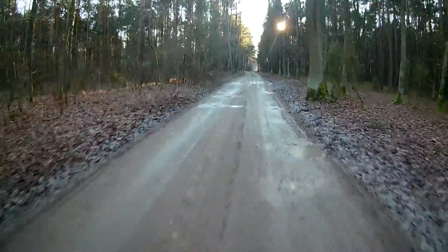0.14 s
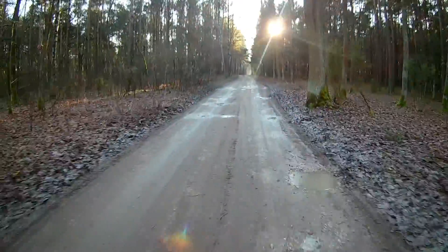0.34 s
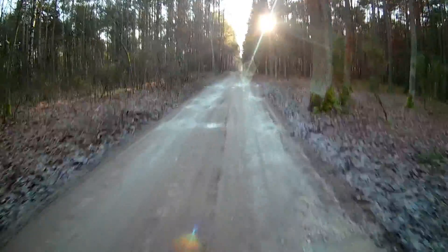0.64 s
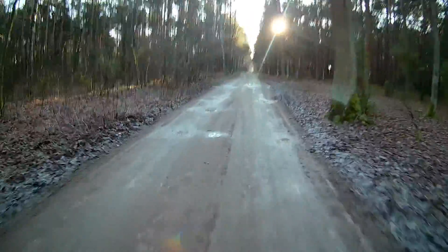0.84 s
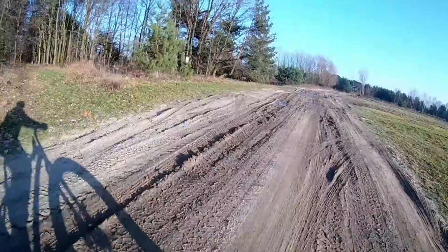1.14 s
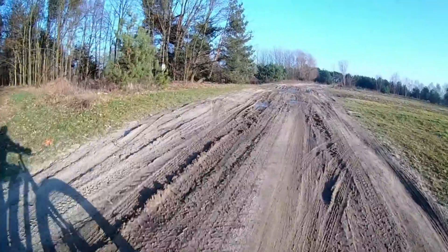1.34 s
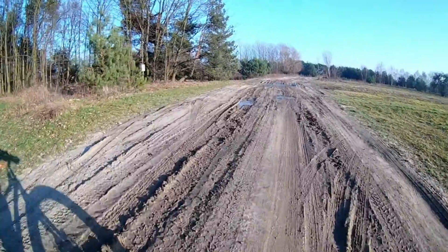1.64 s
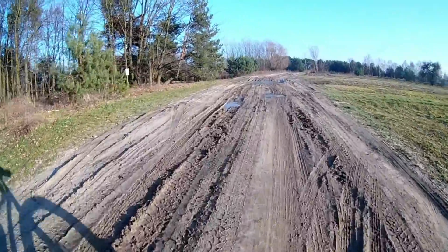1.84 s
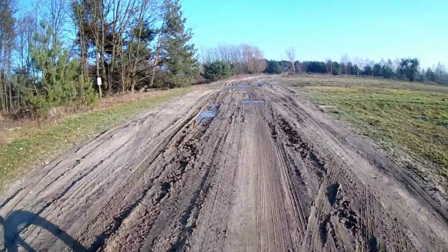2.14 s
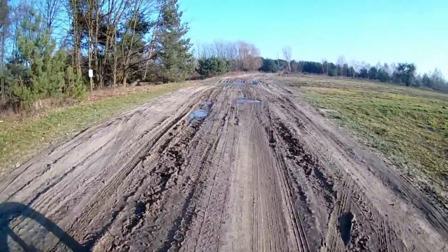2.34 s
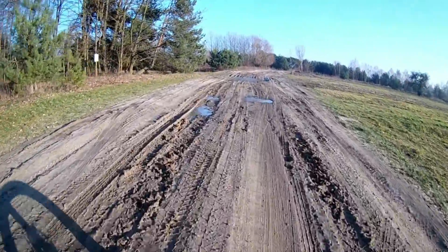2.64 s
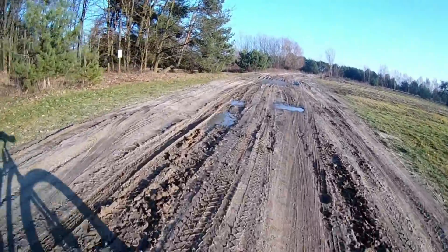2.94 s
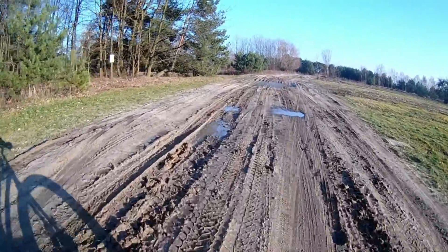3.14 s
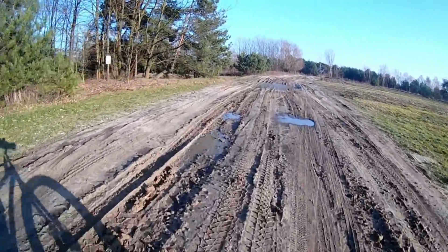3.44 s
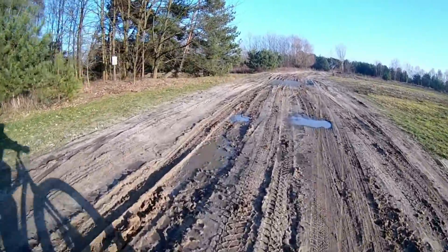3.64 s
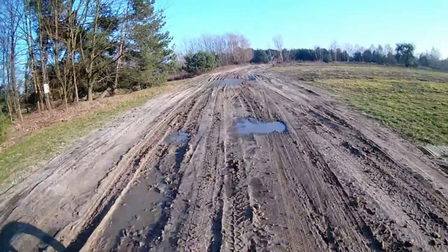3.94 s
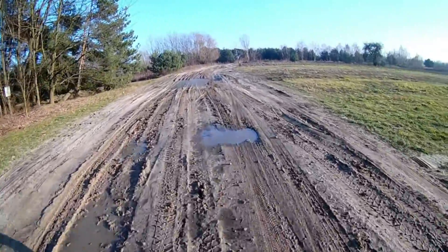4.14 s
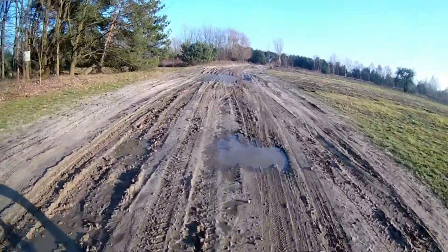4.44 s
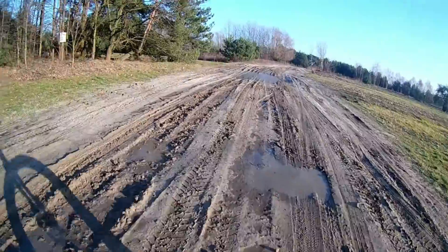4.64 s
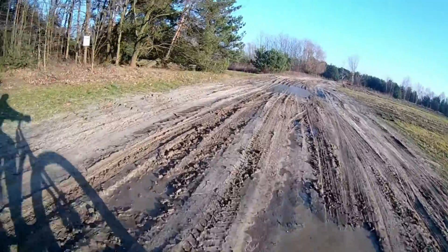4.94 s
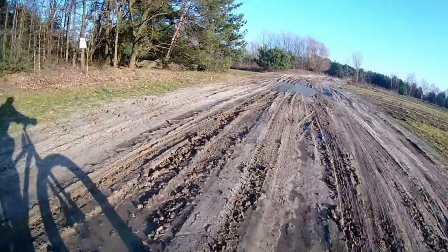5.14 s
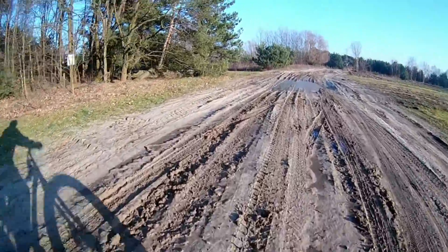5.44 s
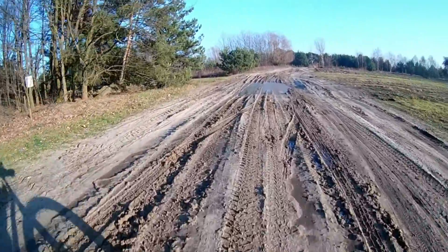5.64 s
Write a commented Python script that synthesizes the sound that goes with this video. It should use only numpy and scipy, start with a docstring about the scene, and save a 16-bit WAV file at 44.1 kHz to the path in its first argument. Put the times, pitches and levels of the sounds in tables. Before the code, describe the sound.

Boxy, close bike-mounted sound: rough wet tyre rumble and hard clacks, a brief dip, then slower muddy rolling with dull knocks and squelches.

```python
"""First comes the fast rumble of a wide-tyred bicycle on a wet forest road, with knocks, clacks and gritty spray.
After a brief dip in level, the bike is pedalled more slowly along a rutted, muddy field track.
The microphone rides in a closed plastic case: random grains stand for the tread and the wet dirt, short bursts
of pushes for knocks and clacks, and most of them ring the case. The mount wobbles at a very low pitch; a rubbing
part sings as narrow noise, two faint high tones sound once, and shaped noise makes buffeting, fizz and hiss."""
import sys
import numpy as np
from scipy import signal
from scipy.fft import rfft, irfft
from scipy.io import wavfile
from scipy.ndimage import uniform_filter1d

SR = 44100
rng = np.random.default_rng(int(sys.argv[2]) if len(sys.argv) > 2 else 0)


def master_out(mix):
    """Clip the mix to full scale and print it as 16-bit PCM to the path in sys.argv[1]."""
    frames = np.transpose(np.atleast_2d(mix))
    ceiling = np.clip(frames, -1, 1)
    pcm = np.round(ceiling * 32767).astype(np.int16)
    wavfile.write(sys.argv[1], SR, pcm)


N = 255339
TIME = np.arange(N) / SR
FREQS = np.maximum(np.fft.rfftfreq(8192, 1 / SR), 1)
# the forest road gives way to the field track at this time (seconds)
CHANGE_S = 1.19


def undb(db):
    """Turn decibels into a gain."""
    return 10 ** (np.asarray(db) / 20)


def unit(x):
    """Scale a sound to an rms level of 1."""
    return x / np.std(x)


def stretch(s, forest, field):
    """Pick the value that holds at time s: one on the forest road, another on the field track."""
    return np.where(s < CHANGE_S, forest, field)


def add(out, s, x):
    """Mix the sound x in at time s, in seconds."""
    i = max(int(s * SR), 0)
    out[i:i + len(x)] += x[:N - i]


def colour(points):
    """Gain at each frequency, drawn through points of pitch in Hz and level in dB."""
    hz, db = np.transpose(points)
    return undb(np.interp(np.log(FREQS), np.log(hz), db))


def resonance(hz, width):
    """Gain of a resonance with steep skirts; width in Hz."""
    return 1 / (1 + (2 * (FREQS - hz) / width) ** 2)


# The pitches at which the case and mount like to ring.
# Each row: pitch in Hz, width in Hz, level in dB.
CASE_RESONANCES = [(301.4, 42, -4.5), (336.5, 62.6, 0), (400, 63, -6), (442, 78, -5), (470.6, 60, 0.5),
                   (567.6, 51, -0.5), (608, 141, -9), (863, 79, -12), (970, 100, -14.5), (1158, 250, -16.5),
                   (1394, 254, -14.5), (1460, 109, -12.5), (1684, 180, -22), (1982, 240, -19.5),
                   (2149, 240, -19), (2703, 286, -27.5), (3253, 178, -30), (3680, 350, -34.5),
                   (4140, 900, -40), (5440, 400, -49), (5940, 260, -46), (6660, 390, -53.5)]


def case(force, bass_db=-15, bass_hz=330):
    """Gain from a force to the microphone: the case's resonances, plus bass that passes straight through."""
    power = sum((undb(db) * resonance(hz, width)) ** 2 for hz, width, db in CASE_RESONANCES)
    bass = undb(bass_db) / (1 + (FREQS / bass_hz) ** 2)
    return np.sqrt(power + bass ** 2) * colour(force)


def ring(x, gain):
    """Pass x through a response with this gain that sounds only after each push (minimum phase)."""
    cepstrum = irfft(np.log(gain + 1e-9))
    half = len(cepstrum) // 2
    # folding the cepstrum puts all of the response after time zero
    cepstrum[1:half] *= 2
    cepstrum[half + 1:] = 0
    response = irfft(np.exp(rfft(cepstrum)))[:half]
    return signal.oaconvolve(x, response)[:len(x)]


def treble(x):
    """The crisp part of a sound, above 2500 Hz."""
    return signal.sosfilt(signal.butter(6, 2500, "high", fs=SR, output="sos"), x)


def strength(x):
    """Highest level of a hit, averaged over 4 ms."""
    return np.sqrt(2 * uniform_filter1d(x ** 2, SR // 250).max())


def hit(push, gain, db):
    """A push rung through a response, at a given peak level in dB."""
    x = ring(push, gain)
    return undb(db) * x / strength(x)


def walk(rate):
    """Random levels that change about rate times a second, joined by smooth slides; spread 1."""
    k = int(SR / rate)
    steps = np.repeat(rng.standard_normal(N // k + 2), k)
    return unit(uniform_filter1d(steps, k)[rng.integers(k):][:N])


def grains(rate, spread_db):
    """Tiny impacts at random moments, about rate a second, a few much larger than the rest."""
    out = np.zeros(N)
    draws = rng.random((N // 10, 4))
    when, size, side, _ = draws[draws[:, -1] < 10 * rate / SR].T
    out[(when * N).astype(int)] = np.sign(side - .5) * undb(-spread_db * np.log(size + .02))
    return out


def chatter(length, rate, rebound):
    """One contact and its quickly fading rebounds, which come at loosely even gaps."""
    t = TIME[:SR // 3]
    gaps = rng.uniform(.3, 1.7, 400) * SR / rate
    when = np.cumsum(gaps).astype(int)
    when = when[when < len(t)]
    side = rng.choice([-1, 1], 400)[:len(when)]
    push = np.zeros(len(t))
    push[when] = rebound * side * np.exp(-t[when] / max(length, 1e-3))
    push[0] = 1
    return push


def strays(per_s, forest_db, field_db, spread_db):
    """Rows of time in seconds and level in dB for small hits at random moments along the ride."""
    when, size, chance = rng.random((300, 3)).T
    s = when * (N - 1) / SR
    db = stretch(s, forest_db, field_db) + spread_db * (2 * size - 1)
    return np.column_stack([s, db])[chance < per_s * N / SR / len(s)]


# On the field track the crank makes this many turns a second, and one leg pushes hardest at PUSH_S seconds.
CRANK_PER_S, PUSH_S = 1.18, 1.61


def pedalling(lag):
    """Effort of the legs, -1 to 1: two pushes for each turn of the crank; lag in seconds."""
    return np.cos(2 * np.pi * 2 * CRANK_PER_S * (TIME - PUSH_S - lag))


# How hard the tread pushes on the case at each pitch, on the forest road and on the field track.
# Each row: pitch in Hz, force in dB.
FOREST_TREAD = [(40, 1), (100, -3), (220, 11), (330, 2.5), (700, 3), (1100, -2.5), (1500, -1.5),
                (2100, -7.5), (3000, -28), (7000, -36.5)]
FIELD_TREAD = [(40, -10), (100, 3.5), (135, -3), (190, 7.5), (250, 1.5), (330, 1), (700, 1), (1100, -2.5),
               (1500, -13), (2100, -5), (3000, -22.5), (4200, -38), (7000, -31.5)]


def tyres(force, db, lumpy_db):
    """Tread blocks slap the ground in uneven bunches and ring the case."""
    push = grains(rate=2300, spread_db=2.5) * undb(lumpy_db * walk(rate=99))
    return undb(db) * unit(ring(push, case(force)))


def buffet(db):
    """Air and ground buffet the case with a low, shapeless rumble, made from bassy noise."""
    spectrum = colour([(10, -9.0), (40, 0.5), (52, 3.0), (66, -4), (80, -17.0), (100, -10.5),
                       (130, -23.5), (200, -22.0), (600, -70.0)])
    return undb(db) * unit(ring(rng.standard_normal(N), spectrum))


# Pitch of the mount's own swing in Hz, and the seconds a swing takes to fade by 60 dB.
MOUNT_HZ, MOUNT_T60 = 31.5, .56


def shake(db, width, slack):
    """The uneven ground keeps the mount wobbling at its own pitch, like noise in a narrow band."""
    swing = signal.hilbert(unit(ring(rng.standard_normal(N), resonance(MOUNT_HZ, width))))
    # the mount stiffens, so its larger swings stay about equal in size
    return undb(db) * swing.real / np.sqrt(np.abs(swing) ** 2 / 2 + abs(slack))


# Deep jolts that set the mount swinging.
# Each row: time of the first swing in seconds, level of the main swing in dB.
JOLTS = [(0.573, -34), (0.794, -38.5), (1.277, -25), (4.082, -43)]


def jolts(overtone_db, overtone_t60, thud_db, rise):
    """A deep bump swings the mount; a stiffer overtone and a thud die first."""
    out, t = np.zeros(N), TIME[:SR] - rise
    turn, age = 2 * np.pi * MOUNT_HZ * t, np.maximum(t, 0)
    swing = np.cos(turn) * undb(-60 * age / MOUNT_T60)
    swing += np.cos(2 * turn) * undb(overtone_db - 60 * age / overtone_t60)
    swing += np.cos(2 * np.pi * 115 * t) * undb(thud_db - 60 * age / 0.017)
    for s, db in JOLTS:
        add(out, s - rise, -undb(db) * swing * np.minimum(1 + t / rise, 1))
    return out


# The bike knocks over the deeper ruts.
# Each row: start in seconds, peak in dB before the trim, fading time of the clatter in seconds.
KNOCKS = [(0.037, -19.5, 0.0092), (0.217, -23, 0.017), (0.361, -21, 0.017), (0.561, -21, 0.0038),
          (0.718, -25.5, 0.022), (1.207, -28, 0.025), (1.268, -27, 0.02), (1.489, -23.5, 0.029),
          (1.621, -27.5, 0.037), (1.691, -29.5, 0.02), (1.795, -25.5, 0.018), (1.945, -25, 0.015),
          (1.998, -26.5, 0.014), (2.091, -28, 0.02), (2.422, -34.5, 0.015), (2.469, -23.5, 0.036),
          (2.534, -39, 0.0099), (2.64, -24.5, 0.0071), (2.667, -30, 0.017), (2.83, -34.5, 0.02),
          (2.9, -26, 0.0066), (2.98, -26.5, 0.032), (3.185, -31, 0.01), (3.266, -21, 0.022),
          (3.411, -33, 0.026), (3.594, -24, 0.0078), (3.854, -24, 0.021), (3.899, -31, 0.0069),
          (3.955, -32, 0.0054), (4.072, -22.5, 0.028), (4.363, -30, 0.015), (4.445, -28, 0.0097),
          (4.485, -28, 0.011), (4.663, -30, 0.015), (4.744, -29.5, 0.0071), (4.988, -21.5, 0.011),
          (5.022, -23, 0.018), (5.236, -31, 0.0055), (5.465, -25.5, 0.035), (5.538, -30.5, 0.0086),
          (5.6, -26, 0.022), (5.642, -27, 0.011)]
# How hard a knock pushes at each pitch. Each row: pitch in Hz, force in dB.
KNOCK_FORCE = [(60, -12), (250, -2.5), (500, 2.5), (900, -4), (1500, -18), (3000, -17.5), (7000, -30.5)]
# The low resonances that ring on. Each row: pitch in Hz, level in dB before the shared and random changes.
KNOCK_RING = [(335, -3.5), (475, -2.5), (570, -0.5)]


def knocks(trim_db, small_length, ring_db, ring_width):
    """Ruts bounce the bike: dull, short clatters, each with its own mix of low ringing, and lesser bumps."""
    out, gain = np.zeros(N), case(KNOCK_FORCE)
    bumps = strays(per_s=3, forest_db=-30, field_db=-38, spread_db=2)
    small = [(s, db, small_length) for s, db in bumps]
    for s, db, length in KNOCKS + small:
        push = chatter(length, rate=450, rebound=0.44)
        ringing = 0
        for hz, mode_db in KNOCK_RING:
            level_db = mode_db + ring_db + 3.9 * rng.standard_normal()
            ringing = ringing + undb(level_db) * resonance(hz, ring_width)
        add(out, s, hit(push, gain * (1 + ringing), db + trim_db))
    return out


# Hard clacks of loose parts.
# Each row: start in seconds, peak in dB before the trim, fading time of the chatter in seconds,
# level of the bright ring in dB before its own trim.
CLACKS = [(0.152, -38, 0.004, -46), (0.166, -24, 0.0011, -39), (0.554, -31.5, 0.0063, -37),
          (0.639, -32, 0.0033, -33), (0.743, -23.5, 0.0057, -46), (0.882, -30.5, 0.007, -43),
          (0.909, -23.5, 0.011, -32.5), (1.066, -32.5, 0.0098, -40.5), (1.082, -28, 0.004, -50),
          (0.954, -28, 0.013, -37), (1.109, -28, 0.0036, -37), (1.241, -22.5, 0.012, -42),
          (1.2595, -26, 0.0015, -37), (1.29, -32, 0.042, -50), (1.3485, -19, 0.004, -38),
          (1.39, -31.5, 0.007, -68), (1.4806, -47, 0.0094, -41), (1.695, -34.5, 0.01, -43),
          (2.36, -65, 0.00088, -38.5), (2.469, -31, 0.0021, -50), (2.529, -38, 0.0024, -35.5),
          (2.5765, -35, 0.0027, -48), (4.4245, -26.5, 0.0035, -28), (4.463, -30, 0.0061, -36),
          (4.5595, -38, 0.0031, -33.5), (4.642, -41, 0.0027, -40.5), (4.729, -40, 0.0064, -59),
          (4.8295, -40, 0.004, -43.5), (5.1, -31, 0.0024, -52)]
# Very short, bright snaps. Each row: start in seconds, peak in dB.
SNAPS = [(1.2601, -28.5), (1.271, -37)]
# How hard a clack and a snap push at each pitch. Each row: pitch in Hz, force in dB.
CLACK_FORCE = [(100, -3.5), (450, -16), (800, 8.5), (1150, 9.5), (1480, 2.5), (2100, 1), (3000, -23.5),
               (4300, -29.5), (7000, -3.5)]
SNAP_FORCE = [(200, -3.5), (900, -7), (2200, 7), (3300, 0), (5000, 9), (7000, 5), (12000, 12), (14000, -9)]
# pitch of the bright ring in a clack
BRIGHT_HZ = 2140


def clacks(trim_db, ring_db, ring_width, small_length, small_ring_db):
    """Hard parts strike and chatter for some milliseconds, each waking a bright ring; a few only snap."""
    out, gain = np.zeros(N), case(CLACK_FORCE)
    bright = gain * resonance(BRIGHT_HZ, ring_width)
    taps = strays(per_s=7, forest_db=-39, field_db=-47, spread_db=3.5)
    small = [(s, db, small_length, db + small_ring_db) for s, db in taps]
    for s, db, length, bright_db in CLACKS + small:
        push = chatter(length, rate=3100, rebound=0.82)
        add(out, s, hit(push, gain, db + trim_db) + hit(push, bright, bright_db + ring_db))
    for s, db in SNAPS:
        add(out, s, hit(chatter(0.0009, rate=580, rebound=0.44), case(SNAP_FORCE), db))
    return out


# Small stones ping off the tyres against the frame.
# Each row: start in seconds, peak in dB before the trim, fading time of the chatter in seconds.
STONES = [(0.077, -40.5, 0.0017), (0.1148, -37.5, 0.0025), (0.1507, -36.5, .006), (0.175, -35.5, 0.0037),
          (0.2618, -38.5, .003), (0.2933, -47, 0.0025), (0.34, -42, .002), (0.387, -43, 0.0017),
          (0.3965, -42, 0.0028), (0.4176, -45.5, 0.0034), (0.4743, -41, 0.0025), (0.5535, -42, 0.003),
          (0.6409, -37, 0.0021), (0.7724, -39.5, 0.0068), (0.9455, -34.5, 0.0042), (0.9971, -38.5, .003),
          (1.012, -42, 0.0025), (1.027, -41, 0.0051), (1.316, -45, .004), (1.3895, -43.5, .003)]
# How hard a stone pushes at each pitch. Each row: pitch in Hz, force in dB.
STONE_FORCE = [(200, -17.5), (600, -11.5), (1000, 1.5), (1450, 0.5), (1750, 7.5), (2150, -2.5), (2800, -5),
               (3400, -3.5), (4300, 5), (6000, 2.5), (7500, 0)]


def stones(trim_db, rebound):
    """A stone gives one hard tick and a few tiny rebounds."""
    out, gain = np.zeros(N), case(STONE_FORCE)
    for s, db, length in STONES:
        add(out, s, hit(chatter(length, rate=2400, rebound=rebound), gain, db + trim_db))
    return out


# The bigger clots of wet grit flung against the bike.
# Each row: time in seconds, peak of the body in dB and peak of the top sizzle in dB, each before its trim.
SPLATS = [(0.163, -41, -47), (0.319, -45.5, -52), (0.7287, -44, -53), (0.7449, -45, -46.5),
          (0.8834, -42.5, -49.5), (0.9108, -43, -47.5), (0.9557, -44, -45.5), (1.1056, -49.5, -50),
          (1.2425, -34, -43), (1.251, -46, -55), (1.287, -45, -61), (1.3482, -35.5, -53.5),
          (1.593, -45, -78), (1.8255, -51, -72), (2.037, -49, -76), (2.149, -50, -74), (2.797, -52.5, -73),
          (3.212, -53.5, -76), (3.257, -49, -80), (3.4648, -52.5, -74), (3.689, -45, -78),
          (3.904, -54, -76), (4.391, -52, -81), (4.4236, -40, -58), (4.49, -46, -58.5), (4.559, -39.5, -71),
          (4.576, -51, -74), (4.627, -59, -70), (4.643, -51, -62), (4.666, -56, -72), (5.034, -49.5, -74),
          (5.101, -51, -74), (5.189, -52, -77), (5.404, -51, -78), (5.491, -50, -78)]
# How hard the body and the sizzle push at each pitch. Each row: pitch in Hz, force in dB.
SPLAT_FORCE = [(200, -13.5), (600, -15.5), (1100, -12.5), (2100, -2), (2700, -4), (3500, 1.5),
               (4100, -10.5), (5000, -14.5)]
SIZZLE_FORCE = [(200, -62), (3200, -19.5), (4100, 3), (5300, -1), (6700, -3), (7600, -13), (12000, -8)]


def splats(trim_db, sizzle_db, length, sand_db, mud_db):
    """A clot of wet grit flattens and bursts into bright ticks; small ones sizzle more on sand than in mud."""
    out, body, top = np.zeros(N), case(SPLAT_FORCE), case(SIZZLE_FORCE)
    age = TIME[:SR // 10] / length
    forest_bits = strays(per_s=6, forest_db=-56, field_db=-54, spread_db=2)
    sandy = [(s, db, db + sand_db) for s, db in forest_bits if s < CHANGE_S]
    field_bits = strays(per_s=5, forest_db=-54, field_db=-59, spread_db=3)
    muddy = [(s, db, db + mud_db) for s, db in field_bits if s > CHANGE_S]
    for s, db, top_db in SPLATS + sandy + muddy:
        chosen = rng.random(len(age)) < 6000 / SR
        ticks = chosen * rng.standard_normal(len(age)) * age * np.exp(-age)
        add(out, s - length / 2, hit(ticks, body, db + trim_db) + hit(ticks, top, top_db + sizzle_db))
    return out


# Showers of wet mud around the hardest jolt and in the puddles.
# Each row: start in seconds, level at the start in dB before the trim, seconds to fade by 60 dB.
SPLASHES = [(1.245, -43, .16), (1.41, -48.5, 0.56), (1.512, -47, 0.069), (2.533, -41, 0.057),
            (2.58, -51, 0.092), (4.47, -45.5, 0.22), (4.564, -49, .13), (4.644, -50, .11),
            (4.99, -56, 0.075), (5.098, -40, 0.076), (5.58, -49, 0.45)]
# How hard pattering mud pushes at each pitch. Each row: pitch in Hz, force in dB.
DEBRIS_FORCE = [(200, -15.5), (600, -0.5), (1000, 10), (1500, 1), (2100, -3.5), (2800, -10), (4200, -10),
                (6000, -2.5), (8000, -1.5)]


def splashes(trim_db, rate, spread_db, rise):
    """Loose wet mud patters on the bike in a shower of grains that quickly fades."""
    age = TIME[:SR // 2]
    shower = np.zeros(N)
    for s, db, t60 in SPLASHES:
        add(shower, s, np.minimum(age / rise, 1) * undb(db + trim_db - 60 * age / t60))
    return shower * unit(ring(grains(rate, spread_db), case(DEBRIS_FORCE)))


# A muddy part rubs and sings in short scrapes.
# Each row: time of the middle in seconds, peak in dB before the trim, length in seconds, pitch in Hz.
SCRAPES = [(0.611, -48, 0.019, 1530), (0.656, -40, 0.044, 1560), (0.698, -40.5, 0.027, 1544),
           (1.732, -42, 0.02, 1495), (1.778, -45.5, .027, 1440), (1.879, -46, .016, 1510),
           (1.92, -39, 0.037, 1466), (1.945, -43, 0.023, 1480), (1.95, -50, .012, 2150),
           (1.971, -41.5, 0.027, 1470), (2.153, -48.5, .028, 1490), (2.222, -43, 0.031, 1420),
           (2.422, -50.5, .012, 2200), (2.442, -50.5, 0.021, 2200), (2.562, -47, 0.0098, 1460),
           (2.594, -50, .008, 2200), (2.68, -45.5, 0.044, 1465), (2.772, -43.5, 0.036, 1467),
           (3.077, -50, 0.016, 2110), (3.345, -51, .012, 2120), (3.414, -46.5, 0.028, 1456),
           (3.502, -38.5, 0.014, 1476), (3.603, -38, 0.017, 1473), (4.019, -51.5, .012, 2130),
           (4.329, -46.5, 0.02, 1480), (4.369, -46, .019, 1476), (4.457, -39.5, 0.034, 1474),
           (4.53, -46, 0.022, 1460), (4.728, -59, .03, 2690), (4.733, -42, 0.022, 1414),
           (4.93, -48.5, .012, 2070), (4.973, -49.5, .012, 2220), (5.185, -56, .03, 2780),
           (5.209, -41.5, .016, 1480), (5.308, -43, .018, 1465), (5.419, -48.5, 0.037, 1480),
           (5.575, -57, .02, 2740), (5.59, -45, 0.021, 1420), (5.681, -43.5, 0.019, 1456)]


def scrapes(trim_db, width, rub_db, rub_hz, drift, waver_db):
    """A muddy part catches in short singing scrapes; on the field it also rubs lightly at a wandering pitch."""
    out, t = np.zeros(N), TIME[:SR // 8]
    for s, db, length, hz in SCRAPES:
        slips = np.sin(np.pi * np.minimum(t / length, 1)) * rng.standard_normal(len(t))
        # start early by half the length, and by the delay of the ringing
        add(out, s - length / 2 - 1 / width / 2, hit(slips, resonance(hz, width), db + trim_db))
    swell = ring(grains(rate=900, spread_db=2), resonance(0, width))
    turn = 2 * np.pi * np.cumsum(rub_hz * (1 + drift * walk(rate=25))) / SR
    rub = unit(swell * np.sin(turn))
    return out + (TIME > CHANGE_S) * undb(rub_db + waver_db * walk(rate=14)) * rub


# Two faint high tones. Each row: pitch in Hz, peak in dB.
TWO_TONE = [(3625, -61), (4165, -60.5)]
# their start and their length in seconds
TWO_TONE_S, TWO_TONE_LENGTH = 1.058, .04


def two_tone(waver):
    """Two faint high tones sound together for an instant, slightly unsteady in pitch."""
    swell = np.sin(np.pi * np.clip((TIME - TWO_TONE_S) / TWO_TONE_LENGTH, 0, 1))
    tones = np.zeros(N)
    for hz, db in TWO_TONE:
        turn = 2 * np.pi * np.cumsum(hz * (1 + waver * walk(rate=400))) / SR
        tones += undb(db) * np.sin(turn)
    return swell * tones


# How hard the wet spray pushes at each pitch, on the forest road and on the field track.
# Each row: pitch in Hz, force in dB.
FOREST_SPRAY = [(200, -17.5), (600, -16), (1100, 2.5), (2100, -13.5), (2700, -1), (3300, 0), (4200, -0.5),
                (6000, 0.5), (9000, -6.5)]
FIELD_SPRAY = [(200, -26.5), (600, -5.5), (1100, -5.5), (1480, -6.5), (2100, -6), (2750, -3), (3600, -5.5),
               (4200, -13.5), (5000, -8), (5800, -11.5), (9000, -15.5)]


def spray(force, db, rate, spread_db, patchy_db, flicker_db):
    """Wet mud peels off the tread in patches; each range of pitch gets its own scatter of drops, flickering on
    its own."""
    x, gain = 0, case(force)
    patch = undb(patchy_db * walk(rate=60))
    edges = [0, 1750, 2450, 3000, 4000, SR]  # Hz
    for low, high in zip(edges, edges[1:]):
        inside = (FREQS > low) & (FREQS <= high)
        band = uniform_filter1d(inside + 1e-3, size=40)  # softened edges
        drops = grains(rate, spread_db) * patch * undb(flicker_db * walk(rate=50))
        x = x + ring(drops, gain * band)
    return undb(db) * x / np.std(treble(x))


# pitch range of the little squelches in the mud
SQUELCH_LOW_HZ, SQUELCH_HIGH_HZ = 888, 3820


def squelches(db, per_s, length, spread_db, rough):
    """Pockets of wet mud pop off the tread as soft, rough blips of different pitch; together they rustle."""
    out, t = np.zeros(N), TIME[:SR // 25]
    draws = rng.random((1500, 5))
    froth = rng.standard_normal((len(draws), len(t)))
    for (when, pitch, size, span, chance), noise in zip(draws, froth):
        if chance < per_s * N / SR / len(draws):
            hz = SQUELCH_LOW_HZ * (SQUELCH_HIGH_HZ / SQUELCH_LOW_HZ) ** pitch
            age = t / (length * (.5 + span))
            turn = 2 * np.pi * np.cumsum(hz * (1 + rough * noise)) / SR
            add(out, when * N / SR, undb(spread_db * size) * age * np.exp(-age) * np.sin(turn))
    heard = ring(out, case(FIELD_SPRAY))
    return undb(db) * heard / np.std(treble(heard))


# How hard fine sand pushes on the case at each pitch. Each row: pitch in Hz, force in dB.
SAND_FORCE = [(200, -43), (1500, -15), (2200, -11.5), (2700, -3), (3400, -2.5), (4200, -1.5), (6000, 0),
              (9000, -9)]


def grit(db, patchy_db):
    """Wet sand crackles off the tread in little bunches of sharp grains."""
    push = grains(rate=600, spread_db=3.5) * undb(patchy_db * walk(rate=110))
    return undb(db) * unit(ring(push, case(SAND_FORCE)))


def swish(db):
    """The wet tread fizzes faintly: noise gathered around 5 kHz."""
    spectrum = colour([(2000, -41), (3500, -8.5), (4200, -1.0), (4800, 1.5), (5500, 3.5),
                       (6300, -6), (7500, -14.5), (10000, -38.0)])
    return undb(db) * unit(ring(rng.standard_normal(N), spectrum))


# Colour of the microphone's own hiss. Each row: pitch in Hz, level in dB.
HISS_COLOUR = [(100, 3.7), (4000, 4.5), (7500, 1.2), (11500, 0.54), (15500, 2.6)]


def hiss(forest_db, field_db):
    """The microphone's steady hiss, stronger on the first stretch."""
    return undb(stretch(TIME, forest_db, field_db)) * unit(ring(rng.standard_normal(N), colour(HISS_COLOUR)))


# The fast forest road; both levels are set before random changes and each sound's own gain.
# Each row: time in seconds, mount shake in dB, tyre rumble in dB.
FOREST_RIDE = [(0.0, -58.5, -39), (0.635, -40, -40.5), (1.11, -44, -39.5), (1.15, -53, -40)]
# Unevenness of the field track, before the same kind of changes.
# Each row: time in seconds, mount shake in dB.
FIELD_SHAKE = [(1.5, -51), (2.4, -62.5), (2.9, -55), (3.4, -53), (4.2, -46), (5.0, -46), (5.79, -49)]
# middle levels in dB that the pushes, the random changes and each sound's own gain then move
FIELD_RUMBLE_DB, FOREST_WET_DB, FIELD_WET_DB = -49, -71, -79.5
# each push of the legs swells the rumble (dB) and, a little later (seconds), the spray (dB)
PUSH_RUMBLE_DB, PUSH_SPRAY_DB, SPRAY_LAG_S = 1, 2.5, 0.093
# how far the rumble surges and dips from patch to patch (dB)
SURGE_DB = 1.5


def scene():
    """Two stretches of track, one after the other, with the same bike."""
    s, shake_db, rumble_db = np.transpose(FOREST_RIDE)
    wobble_db = stretch(TIME, np.interp(TIME, s, shake_db), np.interp(TIME, *np.transpose(FIELD_SHAKE)))
    wobble = undb(wobble_db + 1.8 * walk(rate=6))

    # the ground changes by chance from patch to patch; in the mud each push of the legs is heard too
    field_rumble_db = FIELD_RUMBLE_DB + PUSH_RUMBLE_DB * pedalling(0)
    ride_rumble_db = stretch(TIME, np.interp(TIME, s, rumble_db), field_rumble_db)
    rumble = undb(ride_rumble_db + SURGE_DB * walk(rate=14))
    late_push = pedalling(SPRAY_LAG_S)
    wet_db = stretch(TIME, FOREST_WET_DB, FIELD_WET_DB + PUSH_SPRAY_DB * late_push)
    wet = undb(wet_db + 1.0 * walk(rate=6.7))

    forest = rumble * (tyres(FOREST_TREAD, db=1.0, lumpy_db=0.5) + buffet(db=-5.5))
    forest += wet * spray(FOREST_SPRAY, db=0, rate=900, spread_db=4.5, patchy_db=5.5, flicker_db=0.5)
    forest += grit(db=-74, patchy_db=6.5)

    field = rumble * (tyres(FIELD_TREAD, db=0.5, lumpy_db=1.95) + buffet(db=-10.5))
    field += wet * spray(FIELD_SPRAY, db=3.5, rate=750, spread_db=4.5, patchy_db=3.3, flicker_db=4.0)
    field += wet * squelches(db=-0.5, per_s=200, length=.0013, spread_db=12.0, rough=0.49)
    field += swish(db=-95.5) * undb(2.5 * late_push)

    ride = stretch(TIME, forest, field)
    ride += wobble * shake(db=3.3, width=13, slack=0.38)
    ride += jolts(overtone_db=-10.0, overtone_t60=0.42, thud_db=-8, rise=0.013)
    ride += knocks(trim_db=-9.0, small_length=0.0077, ring_db=-2.5, ring_width=30)
    ride += clacks(trim_db=-9.0, ring_db=-6.0, ring_width=600, small_length=0.0033, small_ring_db=-11.5)
    ride += stones(trim_db=-0.5, rebound=0.7)
    ride += splats(trim_db=1.5, sizzle_db=-4.5, length=0.00189, sand_db=-9.5, mud_db=-31.5)
    ride += splashes(trim_db=-1.5, rate=1300, spread_db=4.0, rise=0.0015)
    ride += scrapes(trim_db=-2.5, width=110.1, rub_db=-63.5, rub_hz=1472, drift=0.00802, waver_db=3.5)
    ride += two_tone(waver=0.0049)
    ride += hiss(forest_db=-80.5, field_db=-84.5)

    # the sound fades almost out and in again between the two stretches
    fade = np.clip((np.abs(TIME - CHANGE_S) - .004) / 0.027, .03, 1)
    return (fade * ride)[None]


# highest pitch that gets through
TOP_HZ = 15700


def record(dry):
    """Cut the top of the sound with a steep low-pass filter."""
    return signal.sosfilt(signal.ellip(10, .2, 70, TOP_HZ, fs=SR, output="sos"), dry)


dry = scene()
out = record(dry)
master_out(out)
```